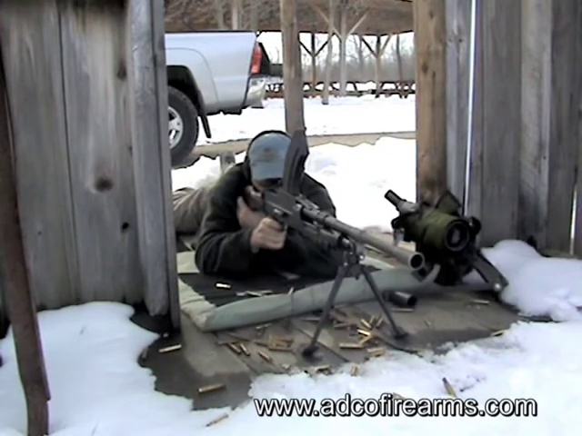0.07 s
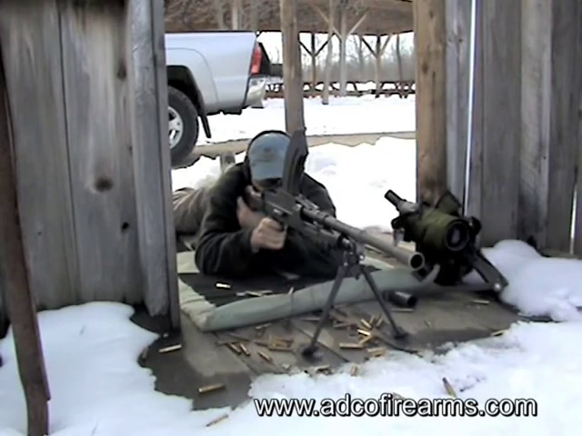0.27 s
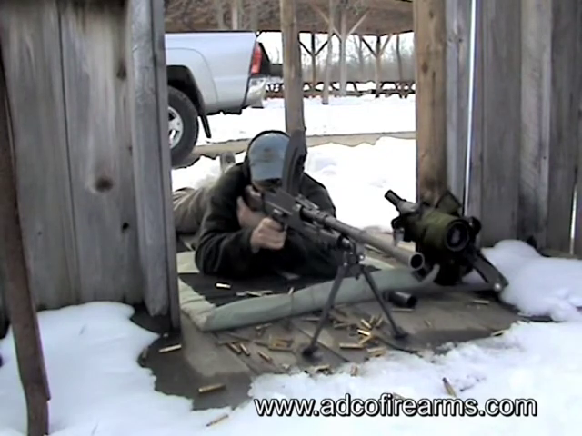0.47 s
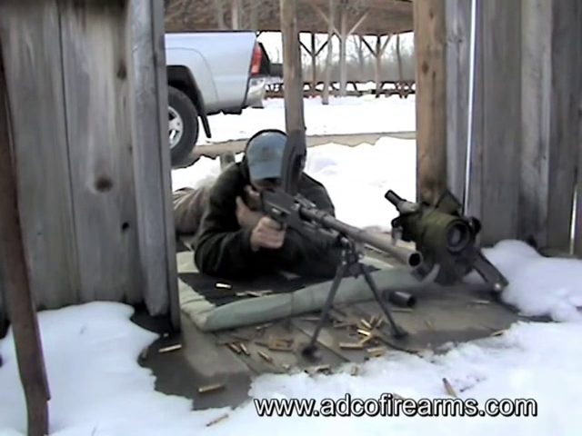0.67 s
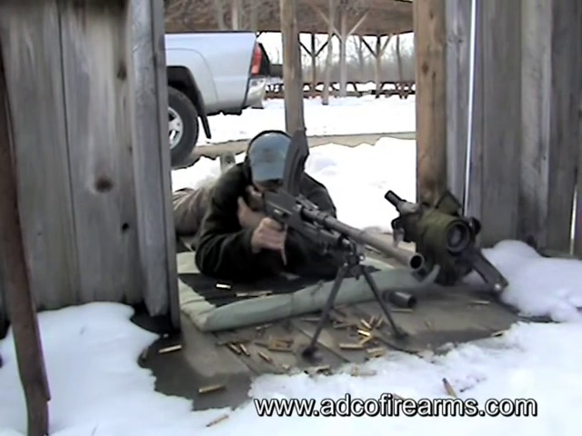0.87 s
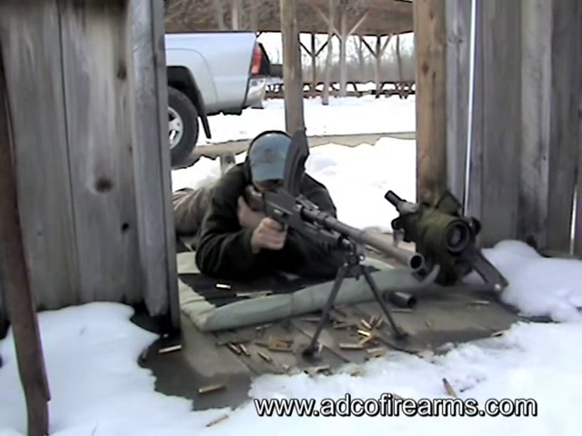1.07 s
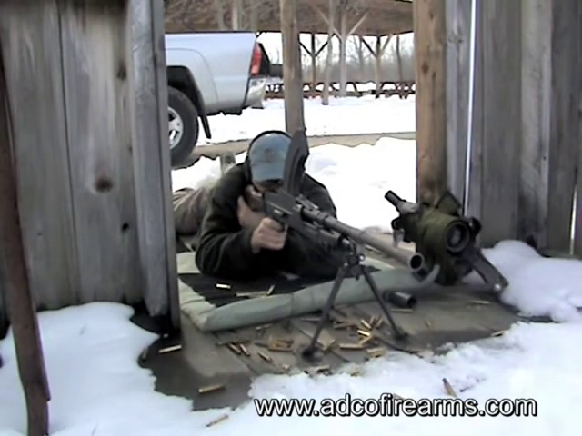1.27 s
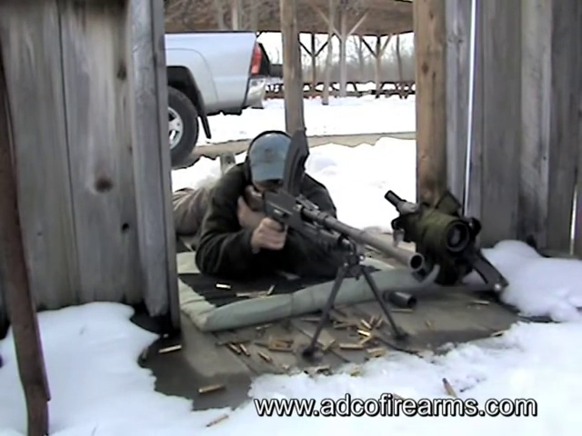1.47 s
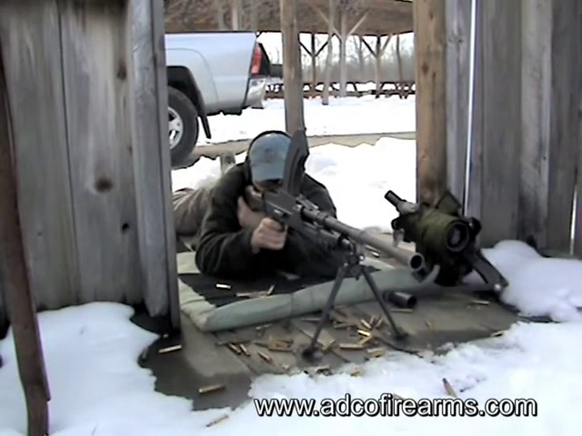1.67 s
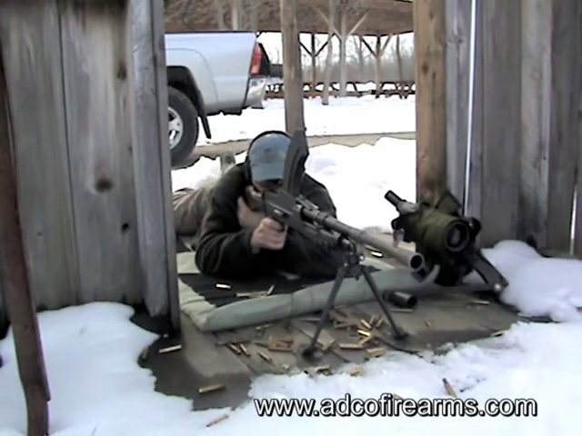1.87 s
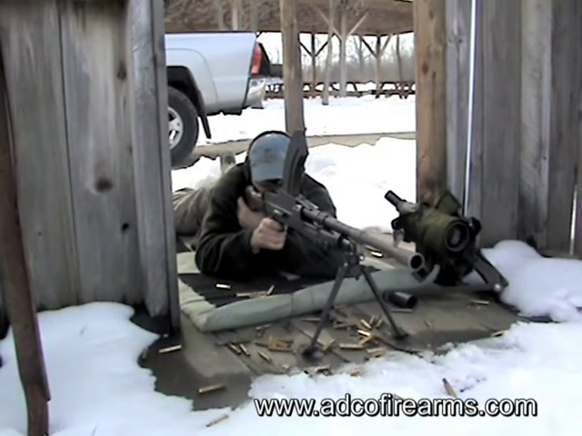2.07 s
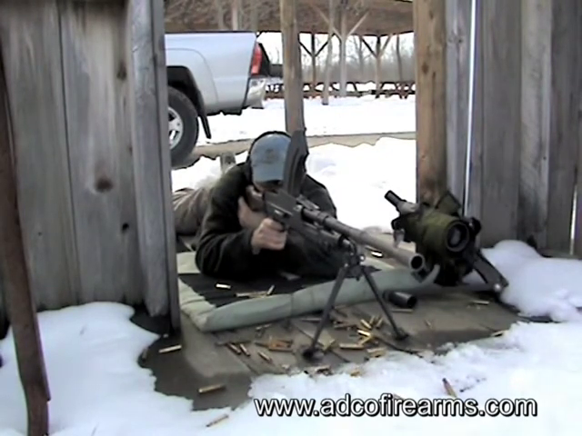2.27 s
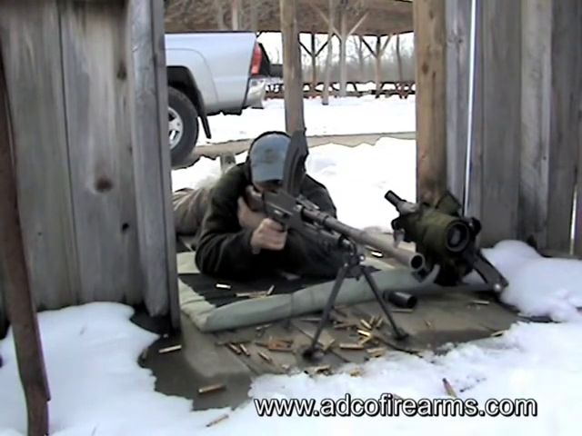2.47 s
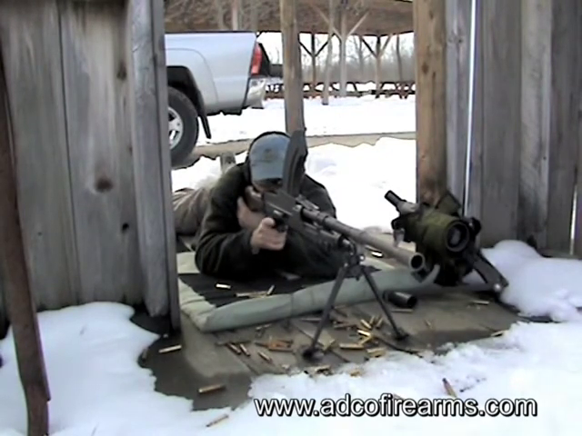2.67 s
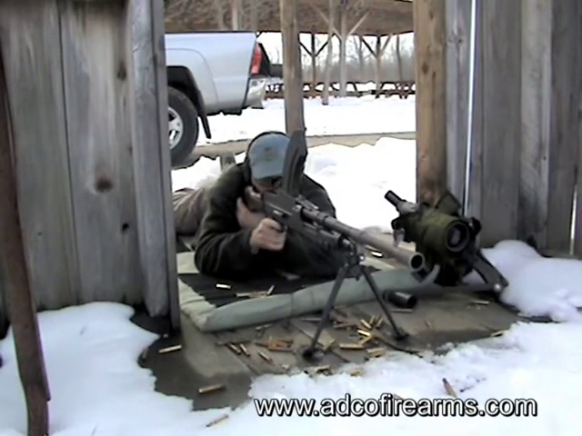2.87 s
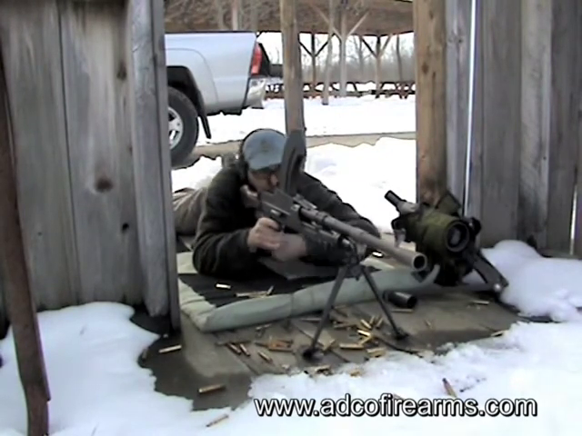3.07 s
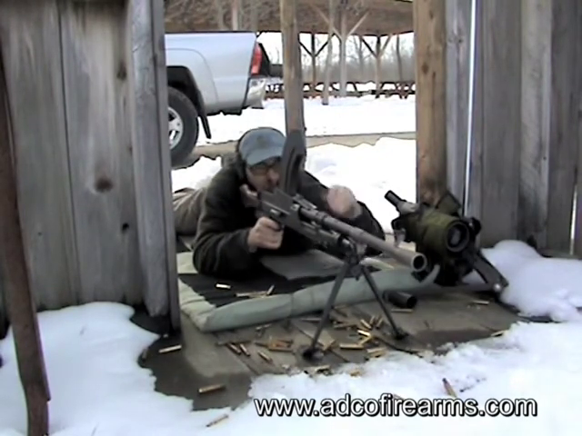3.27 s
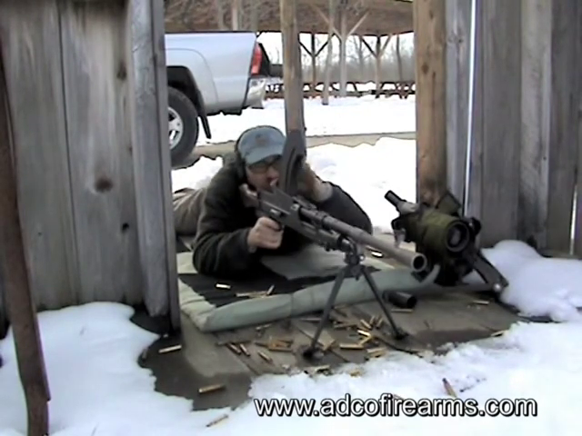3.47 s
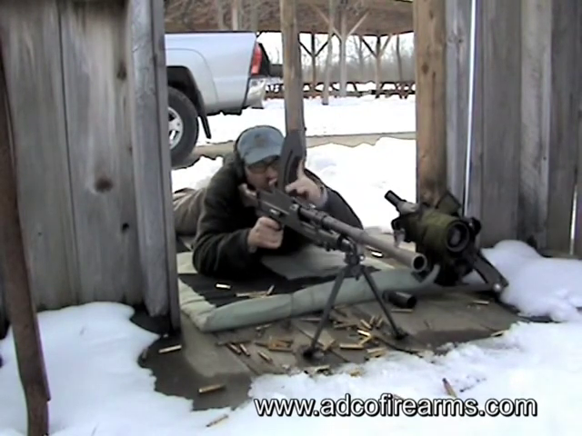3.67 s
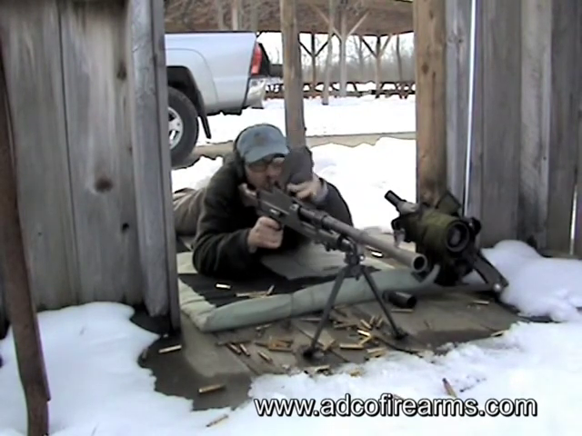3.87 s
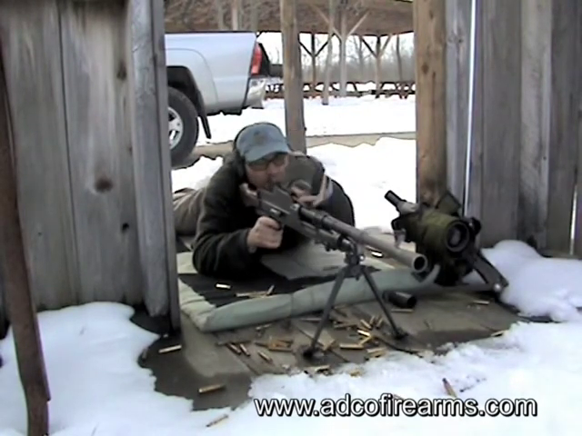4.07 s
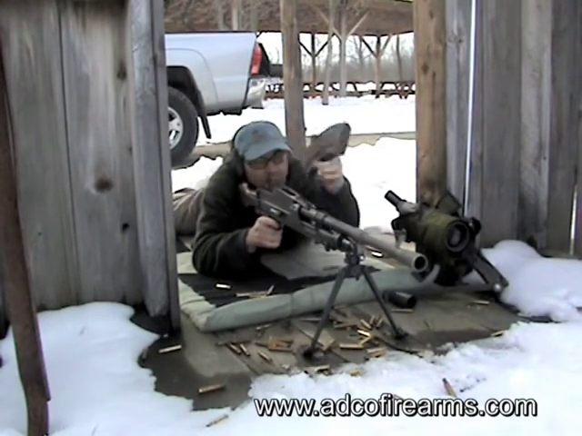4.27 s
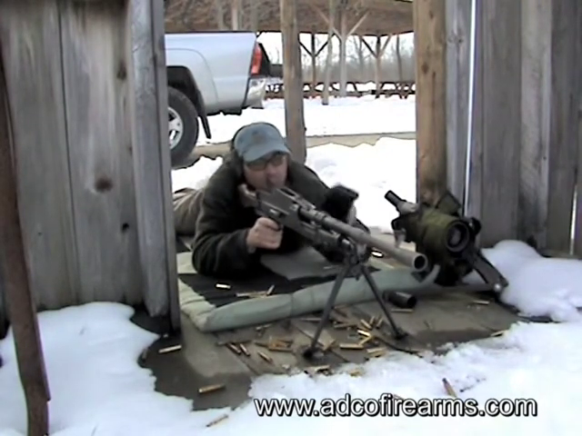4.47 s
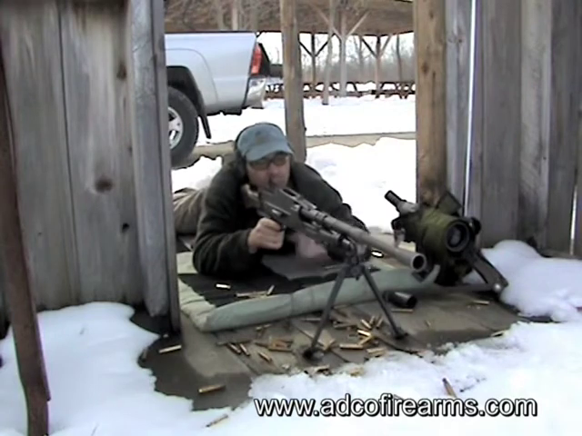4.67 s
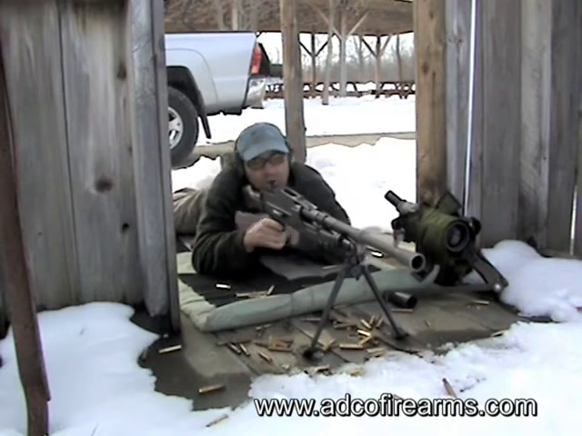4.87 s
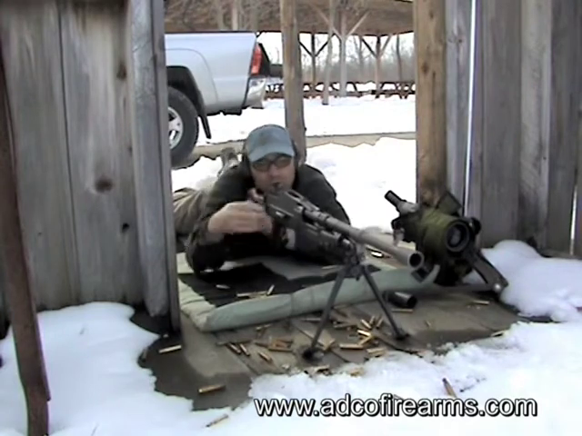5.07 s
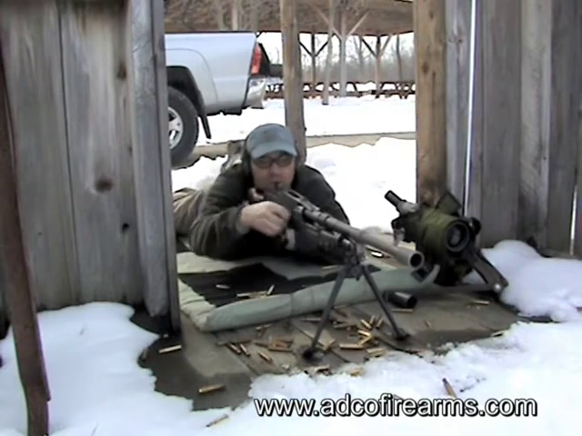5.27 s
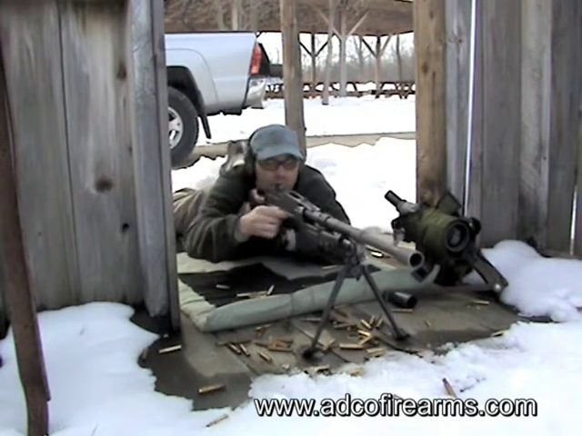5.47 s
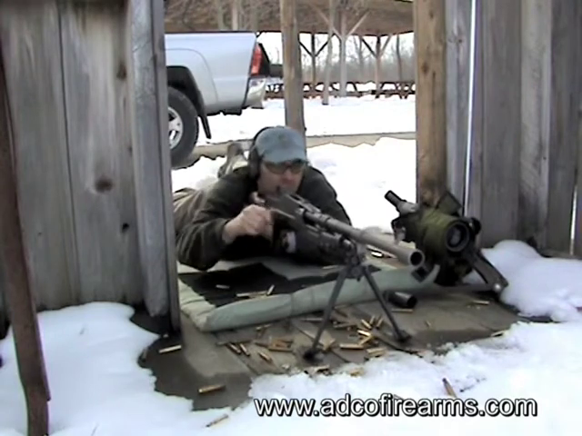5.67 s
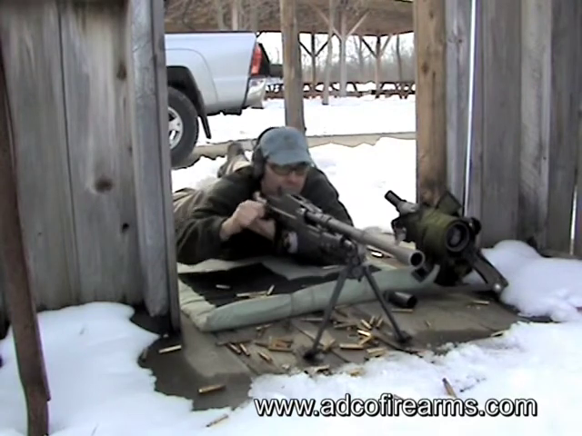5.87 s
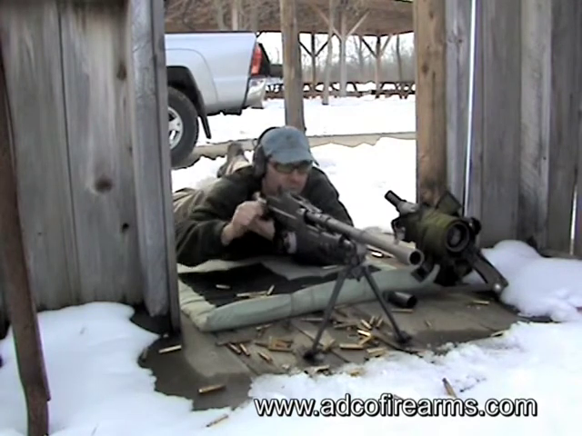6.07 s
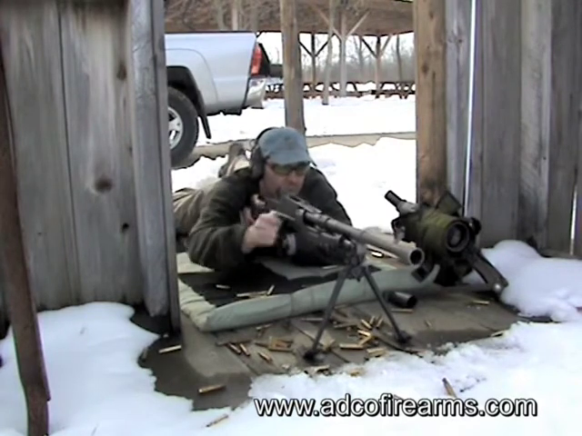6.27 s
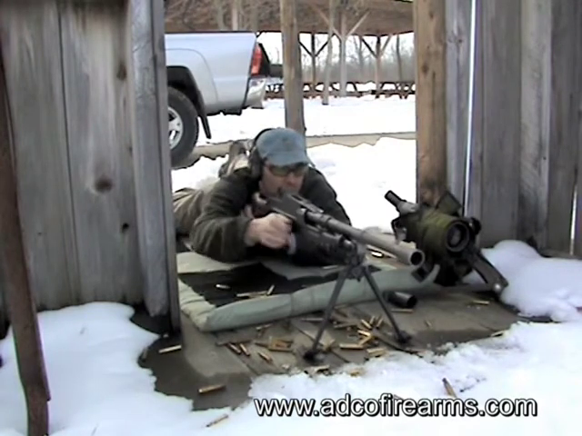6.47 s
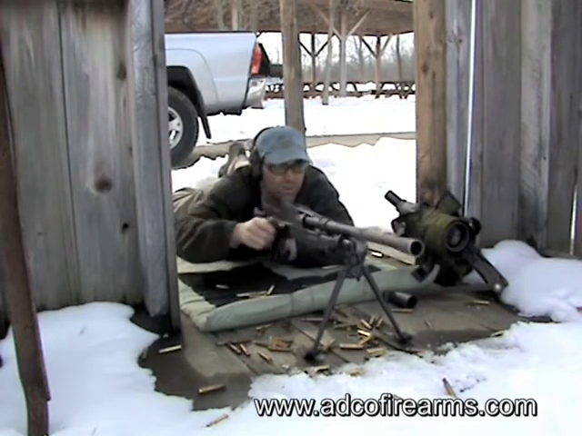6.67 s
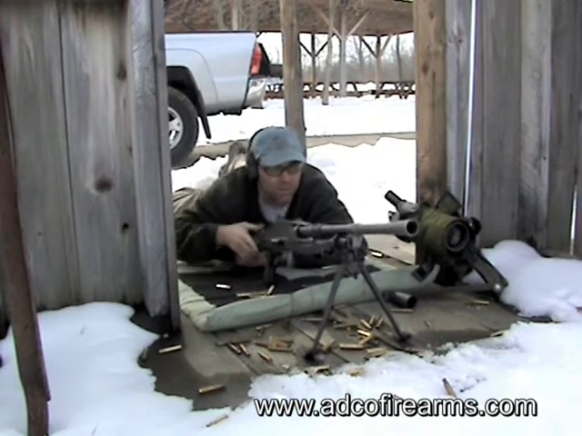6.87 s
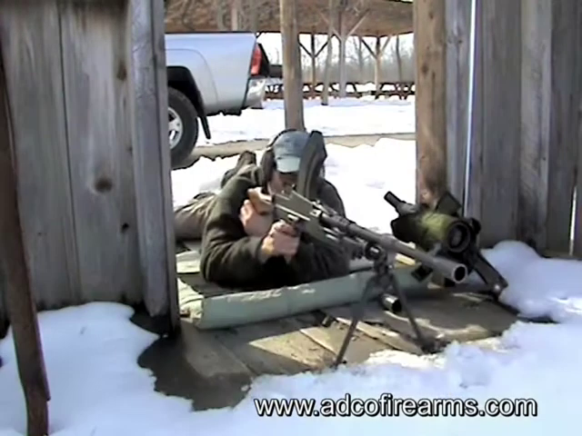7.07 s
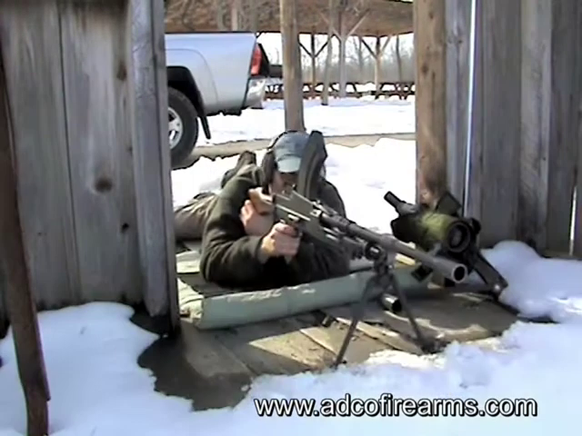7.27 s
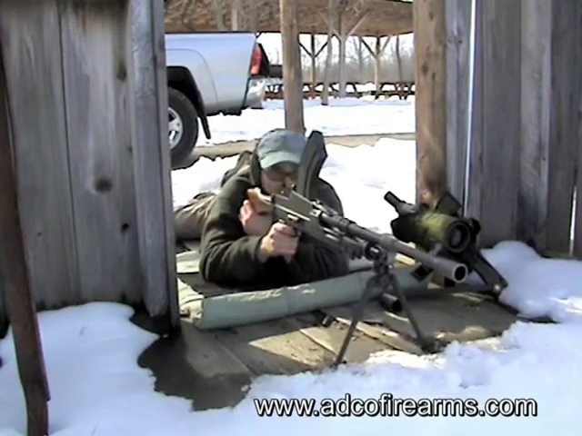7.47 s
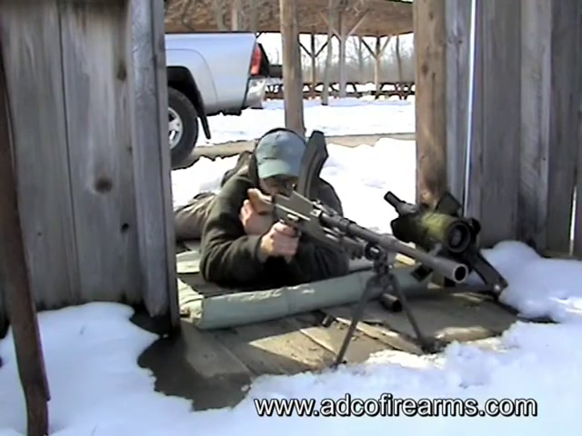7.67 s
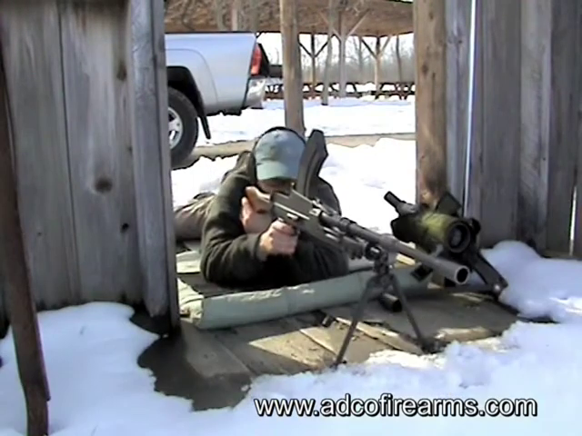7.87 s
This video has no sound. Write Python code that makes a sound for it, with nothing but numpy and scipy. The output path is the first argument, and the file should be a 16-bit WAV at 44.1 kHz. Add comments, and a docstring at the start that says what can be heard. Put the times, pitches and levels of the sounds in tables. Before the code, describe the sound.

Outdoors at a firing range, the tail of an earlier burst is dying away when a light machine gun fires three rapid, saturated shots close by. Echoes roll back from sheds and woods while a spent brass case tinkles. The bolt slams on an empty chamber, then the magazine is changed and the action worked with clacks, taps and faint scrapes. Near the end the faint open-air background abruptly grows louder.

```python
"""Machine-gun burst on a snowy range

A light machine gun fires three rounds from a wooden shelter, overloading the microphone stage: shaped noise bursts.
Sheds ring and the woods roll back filtered noise, also from the burst before; a spent case tinkles in decaying modes.
The bolt slams on an empty chamber, the magazine is changed, the action worked: noise clatter, modes, scrapes.
Open air is coloured noise under a faint sine whine; both step up abruptly near the end."""
import sys
import numpy as np
from scipy import signal
from scipy.fft import rfft, irfft, next_fast_len
from scipy.io import wavfile

SR = 44100
rng = np.random.default_rng(int(sys.argv[2]) if len(sys.argv) > 2 else 0)


def inscribe(sig):
    """Save sig as 16-bit PCM at rate SR to the path in sys.argv[1].

    A 1-D sig is mono; a 2-D sig holds one channel per row.
    Samples are clipped to [-1, 1] before scaling.
    """
    pcm = np.round(np.clip(np.atleast_2d(sig).T, -1, 1) * 32767)
    wavfile.write(sys.argv[1], SR, pcm.astype(np.int16))


N = 349711

# rounds fired, the earlier burst at negative times: (time [s], level [dB])
SHOTS = [(-.88, 0), (-.78, 0), (-.68, 0), (.673, 0), (.777, 1), (.872, -1)]
# bolt flies home, first on a round, then on an empty chamber: (closing time [s], level [dB])
BOLT_CLOSES = [(.662, -14), (2.308, -13)]
LOUDER_S = 7.065  # background and whine step up


def undb(db):
    """Decibels to gain."""
    return 10 ** (np.asarray(db) / 20)


def clock(seconds):
    """Sample times of a sound that long."""
    return np.arange(int(seconds * SR)) / SR


def read(points, hz):
    """Interpolates a (frequency [Hz], value) table on a log-frequency axis."""
    f, value = np.transpose(points)
    return np.interp(np.log(np.maximum(hz, 1)), np.log(f), value)


def fade(t, t60_s):
    """Exponential decay, -60 dB after t60_s."""
    return np.exp(-np.log(1000) * t / np.maximum(t60_s, 1e-3))


def waver(t, rate_hz):
    """Normal random values joined by straight lines, rate_hz of them a second."""
    return np.interp(t * rate_hz, np.arange(1000), rng.standard_normal(size=1000))


def noise(colour, size):
    """Stereo noise of a given colour, rms 1, wider in the treble."""
    # side re mid: (frequency [Hz], level [dB])
    width = [(60, -10.5), (500, -9.5), (2000, -7), (7000, -4), (14000, -5.5)]
    padded = next_fast_len(size, True)
    hz = np.fft.rfftfreq(padded, 1 / SR)
    mid, side = rfft(rng.standard_normal((2, padded))) * undb(read(colour, hz))
    side = side * undb(read(width, hz))
    y = irfft([mid + side, mid - side], padded)[:, :size]
    return y / y.std()


def by_band(x, envelope):
    """Splits a sound into overlapping octaves and gives each its envelope(Hz)."""
    size = x.shape[1]
    padded = next_fast_len(size, True)
    spectrum = rfft(x, padded)
    hz = np.fft.rfftfreq(padded, 1 / SR)
    centres_hz = 16000 / 2. ** np.arange(10)[::-1]
    total = 0
    for centre_hz in centres_hz:
        weight = np.interp(hz, centres_hz, 1. * (centres_hz == centre_hz))
        band = irfft(spectrum * weight, padded)[:, :size]
        total = total + band * envelope(centre_hz)
    return total


def add(out, s, x):
    """Mixes a sound in at time s, which may lie before the start."""
    start = int(s * SR)
    a, b = max(start, 0), min(start + x.shape[1], N)
    if b > a:
        out[:, a:b] += x[:, a - start:b - start]


def ring(modes, t, scatter_db):
    """Decaying modes; each blow excites them differently, each has its own phase per channel."""
    hz, db, t60_s = np.transpose(modes)[:, :, None]
    gain = undb(db + scatter_db * rng.standard_normal(hz.shape))
    phase = rng.uniform(0, 2 * np.pi, hz.shape) + rng.standard_normal((2,) + hz.shape) / 2
    return np.sum(gain * fade(t, t60_s) * np.sin(2 * np.pi * hz * t + phase), axis=1)


def gunfire():
    """Each round: crack and muzzle blast made afresh, then the same answer of sheds and woods."""
    out = np.zeros((2, N))
    surroundings = sheds_ring() + woods_roll()
    for s, db in SHOTS:
        add(out, s, undb(db) * (crack() + blast()))
        add(out, s, undb(db) * surroundings)
    return out


def crack(level_db=8, t60_s=.11, rise_s=.003):
    """Supersonic crack: a bright, fast-decaying noise burst."""
    # (frequency [Hz], level per Hz [dB])
    crack_colour = [(100, -20), (1000, -8), (3000, 0), (7000, 0), (11000, -4), (16000, -10)]
    t = clock(1)
    return noise(crack_colour, len(t)) * undb(level_db) * fade(t, t60_s) * np.minimum(t / rise_s, 1)


def blast(level_db=4.5, lag_s=.025, t60_s=.33, lumps_db=3):
    """Muzzle blast: heavy noise that swells, then decays, thrown back unevenly by planks and posts."""
    # (frequency [Hz], level per Hz [dB])
    blast_colour = [(25, -24), (75, -4), (130, -13), (300, -7), (650, 0), (1500, -6), (4000, -11),
                    (8000, -19), (16000, -30)]
    t = clock(1)
    body = noise(blast_colour, len(t)) * undb(level_db) * fade(np.maximum(t - lag_s, 0), t60_s)
    swell = np.minimum(t / lag_s, 1) ** 2
    return body * swell * undb(lumps_db * waver(t, rate_hz=200))


def sheds_ring(level_db=3.9, rise_s=.1):
    """Ring of the sheds around the firing line: noise with a decay time per band."""
    # (frequency [Hz], level per Hz [dB])
    sheds_colour = [(25, -26), (75, -17), (140, -23), (300, -15), (620, 0), (900, -2), (1600, 1),
                    (3000, -4), (6000, -12), (10000, -25), (16000, -44)]
    # (frequency [Hz], t60 [s])
    sheds_t60 = [(60, .9), (400, .66), (1500, .66), (4000, .56), (8000, .4), (15000, .26)]
    t = clock(4)
    tail = by_band(noise(sheds_colour, len(t)), lambda hz: fade(t, read(sheds_t60, hz)))
    return tail * undb(level_db) * np.minimum(t / rise_s, 1)


def woods_roll(air_db_per_hz_s=.0043):
    """Echo from the woods: the longer the path, the more treble the air has taken."""
    # (frequency [Hz], level per Hz [dB])
    woods_colour = [(30, -29), (90, -25), (180, -21), (300, -8), (430, 0), (620, 0), (850, -4),
                    (1500, -2.5), (2700, -7), (5000, -16.5), (9000, -31), (16000, -55)]
    t = clock(4)
    roll = by_band(noise(woods_colour, len(t)), lambda hz: undb(-air_db_per_hz_s * hz * t))
    return roll * woods_echo(t)


def woods_echo(t, trees_db=-34.3, trees_rise_s=.36, trees_t60_s=6.9,
               hill_db=-29, hill_delay_s=.73, hill_rise_db_per_s=70, hill_t60_s=1.9):
    """Echo gain t seconds after a shot: long roll scattered by near trees, one broad swell off the hillside."""
    trees = undb(trees_db) * np.minimum(t / trees_rise_s, 1) * fade(t, trees_t60_s)
    early, late = np.maximum(hill_delay_s - t, 0), np.maximum(t - hill_delay_s, 0)
    hill = undb(hill_db - hill_rise_db_per_s * early) * fade(late, hill_t60_s)
    return np.hypot(trees, hill)


def bolt_blows():
    """The same run of blows each time the bolt is let go: (s, dB, bass dB, treble dB)."""
    # sear, feed, locking, closing, rebound, settling:
    # (time from closing [s], relative level [dB], relative bass [dB], relative treble [dB])
    bolt_run = [(-.057, -16.5, -16, 1), (-.023, -20, -15, 0), (-.010, -10, -17, -2), (0, 0, -14, 1),
                (.009, -8, -12, 4), (.041, -15, -17, 4)]
    blows = []
    for s, db in BOLT_CLOSES:
        for lag_s, stage_db, bass, treble in bolt_run:
            blows.append((s + lag_s, db + stage_db, bass, treble))
    return blows


def contacts(seating_bass_db=3, seating_treble_db=-2):
    """Blows made by hand, (s, dB, bass dB, treble dB): taps, latch strikes and their duller seatings."""
    # magazine and action handled; a part strikes, then seats: (time [s], relative level [dB],
    # relative bass [dB], relative treble [dB], seating lag [s], seating re strike [dB])
    latches = [(3.745, -43, -4, -8, .015, -6), (3.892, -30, -14, -5, .015, -13),
               (4.066, -30.5, -7, -14, .042, -25), (4.78, -18.5, -6, 0, .019, -8),
               (4.913, -31.5, -7, -9, .034, -16), (5.697, -23, -11, -1, .012, -1),
               (5.932, -22.5, -20, 0, .017, -17), (6.059, -24.5, -21, 0, .013, 2),
               (6.081, -24, -22, 0, .011, -6), (6.212, -30, -16, -1, .019, -2)]
    # steel on steel: (time [s], relative level [dB], relative bass [dB], relative treble [dB])
    taps = [(2.653, -58, -12, -2), (3.157, -48, -14, -9), (3.659, -63, -12, -8), (4.262, -51, -3, -18),
            (5.501, -45, -3, -3), (5.603, -57, -4, 0), (5.917, -37, -17, -8), (6.136, -40, -14, -6),
            (6.174, -48, -16, 3), (6.335, -50, -14, -12), (6.373, -47, -11, -14), (6.407, -24.5, -14, -4),
            (6.464, -18, -19, -4), (6.601, -52, -13, -14), (6.915, -56, -9, -7), (7.529, -44, -2, -16)]
    blows = list(taps)
    for s, db, bass, treble, lag_s, seating_db in latches:
        blows.append((s, db, bass, treble))
        blows.append((s + lag_s, db + seating_db, bass + seating_bass_db, treble + seating_treble_db))
    return blows


def action(level_db=8, bass_db=6, treble_db=4.5, rise_s=.0035, bass_t60_s=.07, treble_t60_s=.052,
           chatter_db=3, ring_db=-38, parts_db=-18, parts_t60_s=.06):
    """Steel strikes steel: dense damped clatter, brief ring of the parts that met, receiver modes."""
    # colour of a clack: (frequency [Hz], level per Hz [dB])
    steel = [(40, -26), (150, -20), (330, -12), (620, 0), (1000, 0), (1500, 2), (2700, 0), (3400, -3),
             (4600, -1), (8000, -5), (12000, -12), (16000, -17)]
    # (frequency [Hz], relative level [dB], t60 [s])
    receiver = [(1432, 3, .35), (2536, -2, .35), (3386, -10, .17), (3849, -7, .15), (4145, -11, .22),
                (4775, 1, .15), (5561, -11, .15), (6449, -9, .16), (7203, -6, .13), (8091, -10, .16)]
    out, short, t = np.zeros((2, N)), clock(.1), clock(.3)
    attack = np.minimum(short / rise_s, 1)
    t60 = [(400, bass_t60_s), (6000, treble_t60_s)]
    for s, db, bass, treble in bolt_blows() + contacts():
        low_db = np.clip(bass + bass_db, -15, 10)
        high_db = np.clip(treble + treble_db, -14, 8)
        shade = [(500, low_db), (1400, 0), (2500, 0), (7500, high_db)]
        clatter = by_band(noise(steel, len(short)), lambda hz: undb(read(shade, hz)) * fade(short, read(t60, hz)))
        # loose parts chatter within the blow
        clatter *= undb(chatter_db * waver(short, rate_hz=700))
        # every contact point has its own handful of pitches
        pitches_hz = 1400 * 7 ** rng.random(size=12)
        part_modes = [(hz, parts_db + read(shade, hz), parts_t60_s) for hz in pitches_hz]
        parts = ring(part_modes, short, scatter_db=3)
        add(out, s - rise_s / 2, undb(db + level_db) * (clatter + parts) * attack)
        add(out, s, undb(db + ring_db + level_db) * ring(receiver, t, scatter_db=2))
    return out


def knocks(magazine_db=-2.5, thud_db=-3, thud_t60_s=.13, rise_s=.004):
    """The hollow magazine rings with the bass of each hand blow; jolts pass via the bipod into the floor."""
    # (frequency [Hz], relative level [dB], t60 [s])
    magazine = [(420, -9, .12), (603, -3, .09), (630, -1, .12), (732, -3, .09), (880, -5, .08),
                (1120, -1, .085), (1453, -2, .08)]
    # floor jolts: (time [s], relative level [dB])
    thuds = [(2.309, -23), (4.783, -35), (4.947, -51), (5.705, -49), (6.073, -41), (7.529, -43)]
    thud_colour = [(30, -10), (80, 1), (160, -3), (380, 0), (600, -14), (1500, -45), (5000, -70)]
    out, t = np.zeros((2, N)), clock(.4)
    attack = np.minimum(t / rise_s, 1)
    for s, db, bass, _ in contacts():
        add(out, s, undb(db + bass + magazine_db) * ring(magazine, t, scatter_db=2) * attack)
    for s, db in thuds:
        thud = noise(thud_colour, len(t)) * fade(t, thud_t60_s)
        add(out, s, undb(db + thud_db) * thud * attack)
    return out


def handling(grain_db=4):
    """Sleeves, sliding parts, bolt on its rails and shivering spring: band-shaped noise in uneven grains."""
    # bolt rubs, then spring shivers: (time from closing [s], length [s], relative level [dB], centre [Hz])
    bolt_slide = [(-.055, .055, -23, 4500), (-.003, .04, -8, 5000), (.022, .11, -24, 5000)]
    # sleeves and parts: (time [s], length [s], level [dB], centre [Hz])
    scrapes = [(3.05, .09, -66, 5000), (3.71, .08, -60, 2000), (4.08, .21, -60, 900),
               (4.225, .06, -54, 1200), (4.62, .13, -68, 3000), (5.02, .11, -63, 3500),
               (5.16, .07, -66, 5000), (5.99, .05, -51, 6000), (6.32, .07, -54, 1700),
               (7.79, .22, -56, 3500)]
    out = np.zeros((2, N))
    slides = []
    for s, db in BOLT_CLOSES:
        for lag_s, length_s, slide_db, hz in bolt_slide:
            slides.append((s + lag_s, length_s, db + slide_db, hz))
    for s, length_s, db, hz in slides + scrapes:
        t = clock(length_s)
        colour = [(100, -25), (500, -5), (hz, 0), (2 * hz, -9), (16000, -26)]
        grains = undb(db + grain_db * waver(t, rate_hz=250))
        add(out, s, noise(colour, len(t)) * grains * np.sin(np.pi * t / length_s))
    return out


def squeak(at_s=2.411, hz=4450, level_db=-31, width_s=.007):
    """Steel squeaks once after the bolt has closed: a sine under a Gaussian envelope."""
    t = np.arange(N) / SR - at_s
    return undb(level_db) * np.exp(-(t / width_s) ** 2) * np.sin(2 * np.pi * hz * t)


def spent_case(tick_db=-4, tick_t60_s=.32, spin_hz=43, spin_depth=.6):
    """A brass case skips over concrete, ticking at each bounce; its ring flutters as it tumbles."""
    # (time [s], relative level [dB])
    bounces = [(1.194, -34), (1.212, -31), (1.243, -40), (1.305, -44), (1.505, -60), (1.75, -74)]
    # case modes: (frequency [Hz], relative level [dB], t60 [s])
    brass = [(6650, 1, .07), (7330, -8, .3), (9588, -9, .35), (10120, -11, .25), (10410, -2, .28),
             (10505, -5, .38), (14930, -17, .25)]
    tick_colour = [(2000, -50), (6000, -25), (7200, -11), (8500, -22), (9300, -7), (10500, 0),
                   (11100, -5), (11800, -27), (14500, -30), (15400, -18)]
    out, t = np.zeros((2, N)), clock(.8)
    attack = np.minimum(t / .002, 1)
    for s, db in bounces:
        tick = undb(tick_db) * noise(tick_colour, len(t)) * fade(t, tick_t60_s)
        tumble = 1 + spin_depth * np.cos(2 * np.pi * spin_hz * rng.uniform(.7, 1.3) * t)
        add(out, s, undb(db) * (ring(brass, t, scatter_db=3) * tumble + tick) * attack)
    return out


def shelter(x, wet_db=-22, mid_t60_s=.42, treble_t60_s=.3):
    """Plank walls and roof add a short, weak reverberation: convolution with decaying noise."""
    t = clock(1)
    colour = [(100, -8), (500, -2), (1100, 2), (3000, -1), (6000, 0), (15000, -5)]
    t60 = [(5000, mid_t60_s), (14000, treble_t60_s)]
    walls = by_band(noise(colour, len(t)), lambda hz: fade(t, read(t60, hz)))
    walls *= np.minimum(t / .015, 1)
    walls *= undb(wet_db) / np.sqrt(np.sum(walls ** 2) / 2)  # set mean energy per channel
    return x + signal.fftconvolve(x, walls, axes=1)[:, :N]


def open_air(quiet_db=-66.7, louder_db=-56.3, rumble_db=-58, rumble_waver_db=3):
    """Faint outdoor rumble and hiss; near the end it steps up abruptly, with an uneven low rumble."""
    # (frequency [Hz], level per Hz [dB])
    quiet_colour = [(25, -8), (60, -1), (85, 1), (130, -7), (180, -11), (300, -10), (600, -8), (1000, -14),
                    (2000, -23), (2550, -22), (3200, -27), (6000, -29), (15000, -34)]
    # (frequency [Hz], level per Hz [dB])
    louder_colour = [(30, 2), (130, 2), (250, -1), (560, 1), (1000, -4), (2000, -9), (4000, -12),
                     (6000, -20), (15000, -23)]
    rumble_colour = [(20, -6), (45, 0), (80, 0), (160, -18), (600, -50), (3000, -80)]
    t = np.arange(N) / SR
    rumble = undb(rumble_db + rumble_waver_db * waver(t, rate_hz=12)) * noise(rumble_colour, N)
    quiet = undb(quiet_db) * noise(quiet_colour, N)
    louder = undb(louder_db) * noise(louder_colour, N)
    return np.where(t < LOUDER_S, quiet, louder + rumble)


def whine(hz=2519, early_db_rms=-89, late_db_rms=-79):
    """Faint sine whine that steps up with the background."""
    t = np.arange(N) / SR
    gain = undb(np.where(t < LOUDER_S, early_db_rms, late_db_rms))
    return np.sqrt(2) * gain * np.sin(2 * np.pi * hz * t)


def scene():
    """Shots, gun handling and the falling case in the open air."""
    near = action() + knocks() + handling() + squeak() + spent_case()
    return gunfire() + shelter(near) + open_air() + whine()


def record(dry, ceiling=.79, top_hz=15700):
    """The microphone stage saturates smoothly towards its ceiling; a steep low-pass cuts the top."""
    clipped = ceiling * dry / (ceiling ** 4 + dry ** 4) ** (1 / 4)
    low_pass = signal.ellip(10, .1, 70, top_hz, fs=SR, output="sos")
    return signal.sosfilt(low_pass, clipped)


dry = scene()
out = record(dry)
inscribe(out)
```